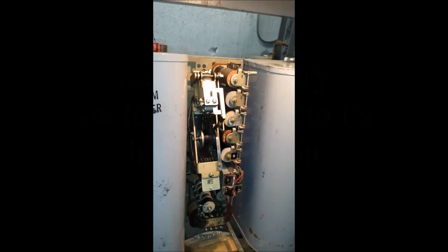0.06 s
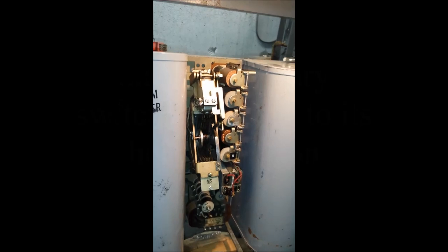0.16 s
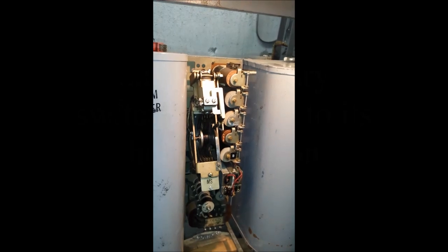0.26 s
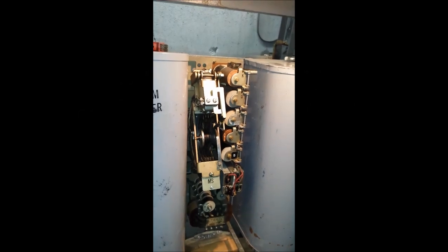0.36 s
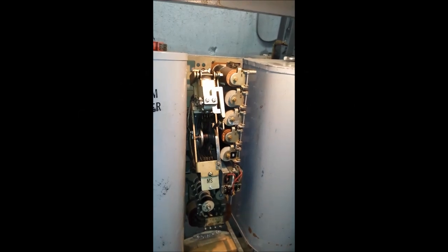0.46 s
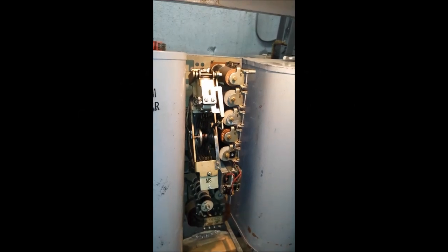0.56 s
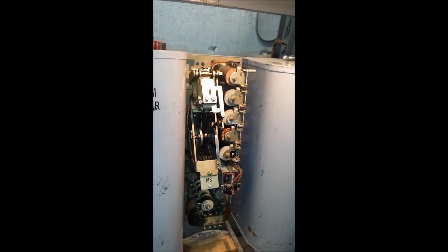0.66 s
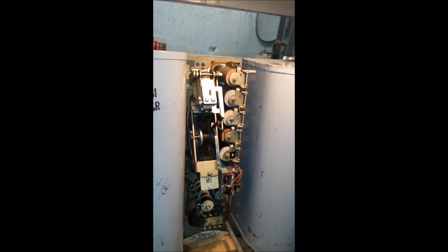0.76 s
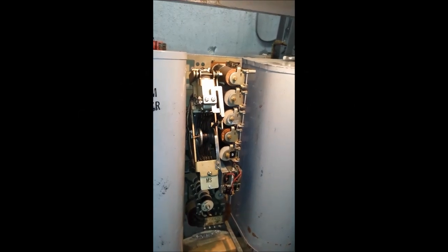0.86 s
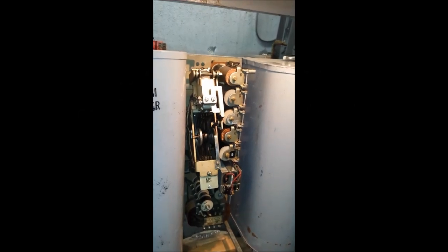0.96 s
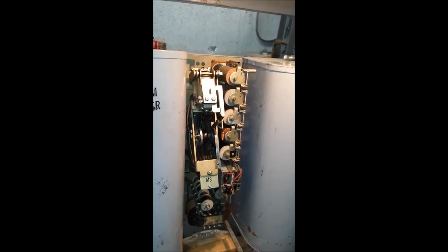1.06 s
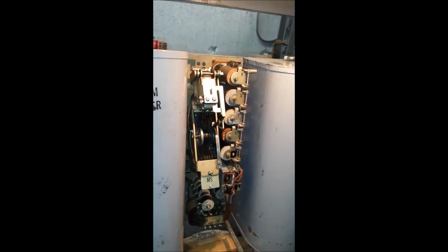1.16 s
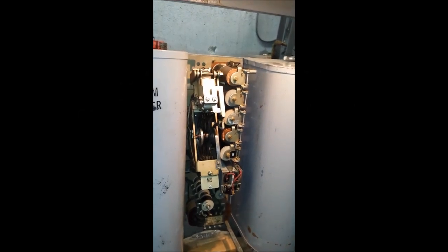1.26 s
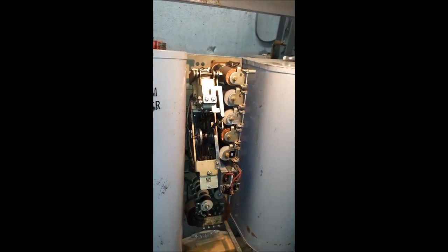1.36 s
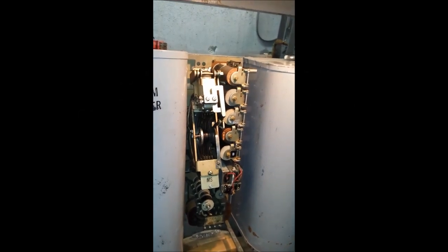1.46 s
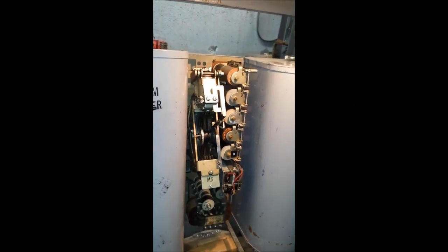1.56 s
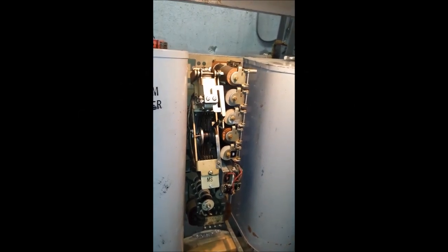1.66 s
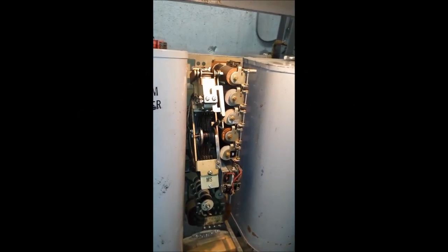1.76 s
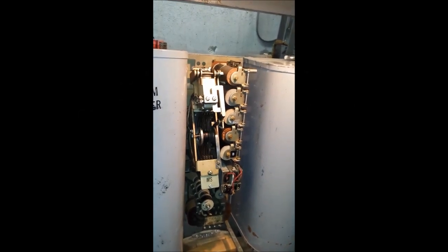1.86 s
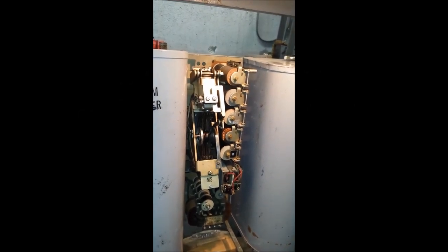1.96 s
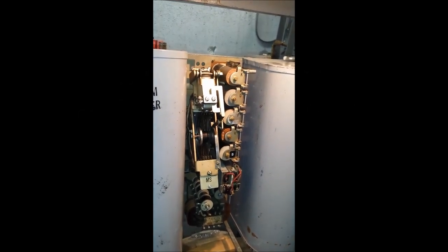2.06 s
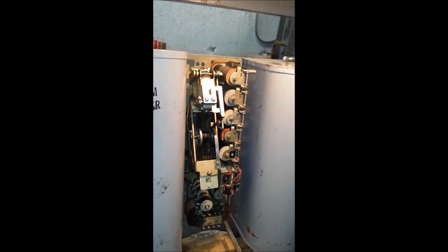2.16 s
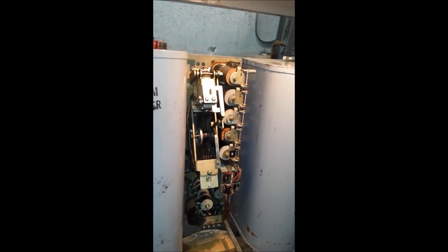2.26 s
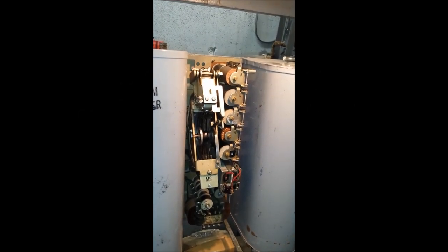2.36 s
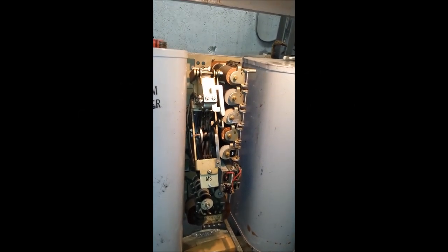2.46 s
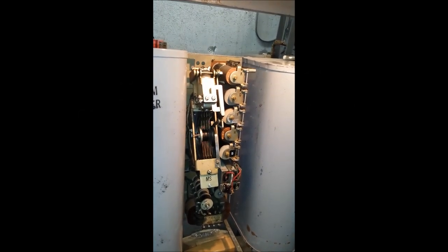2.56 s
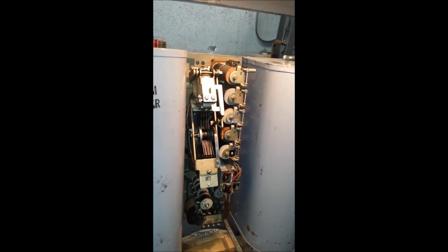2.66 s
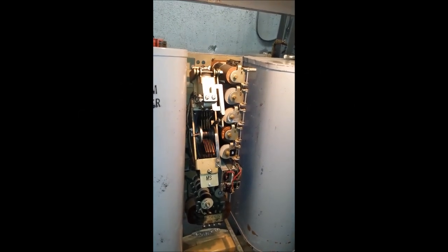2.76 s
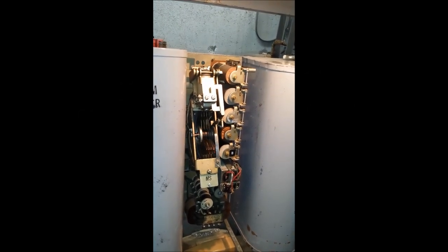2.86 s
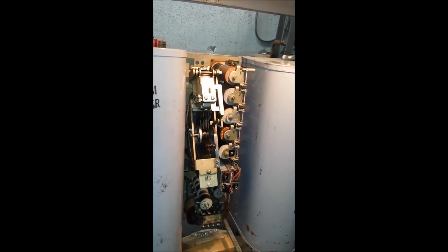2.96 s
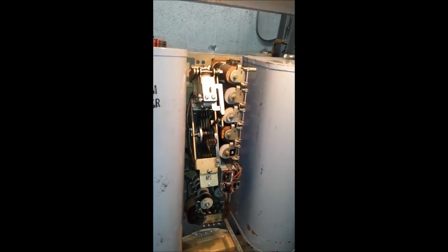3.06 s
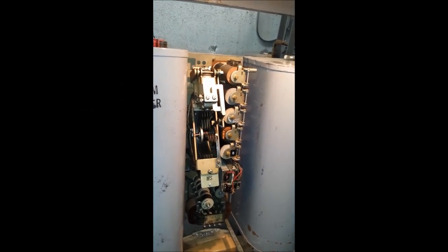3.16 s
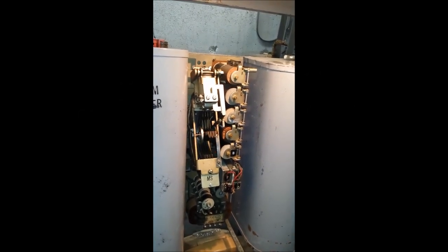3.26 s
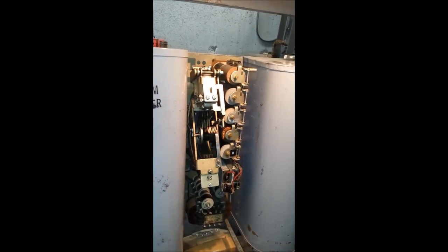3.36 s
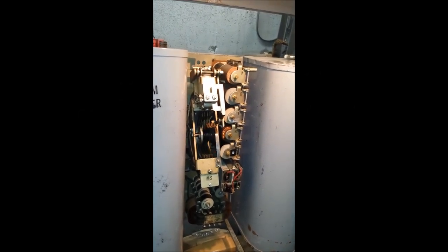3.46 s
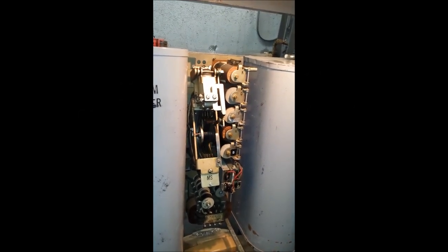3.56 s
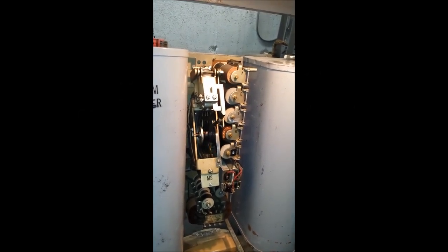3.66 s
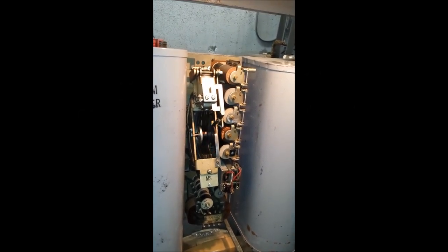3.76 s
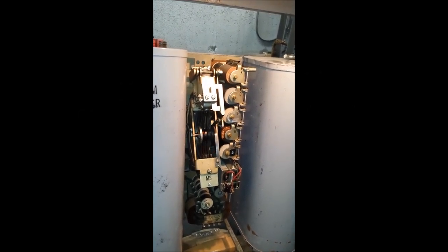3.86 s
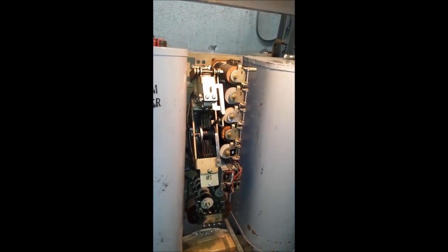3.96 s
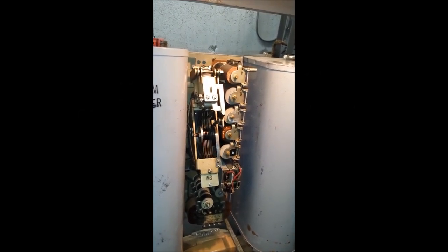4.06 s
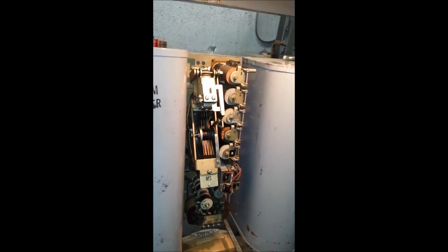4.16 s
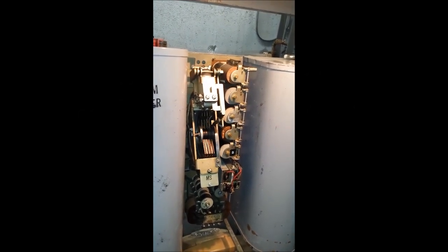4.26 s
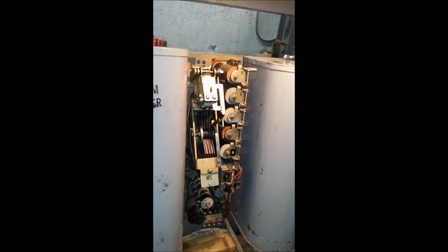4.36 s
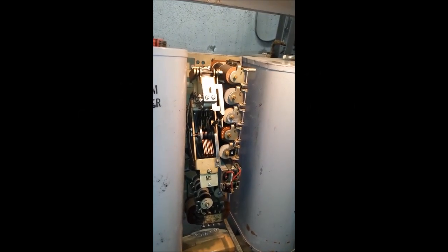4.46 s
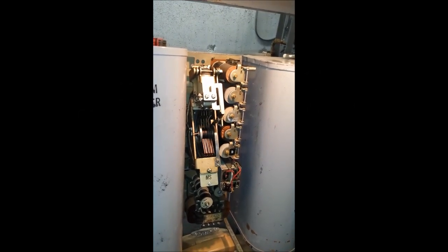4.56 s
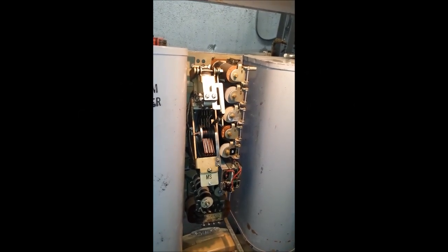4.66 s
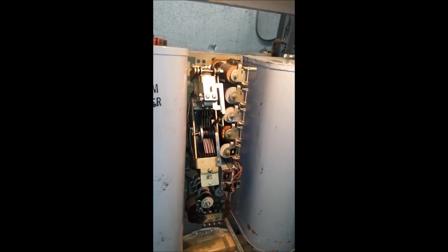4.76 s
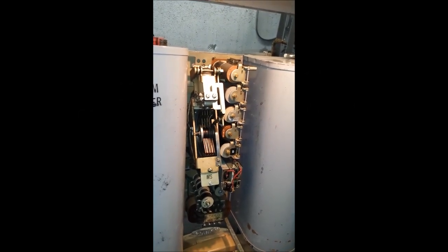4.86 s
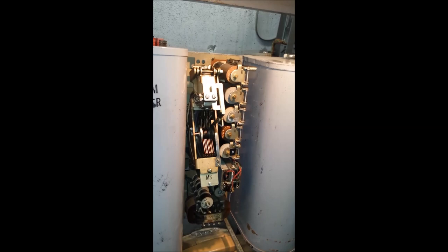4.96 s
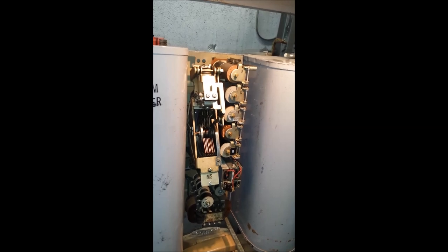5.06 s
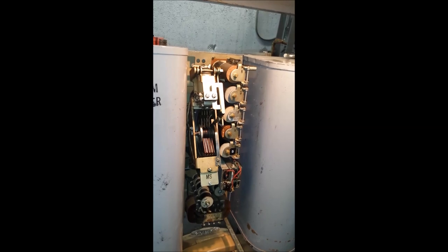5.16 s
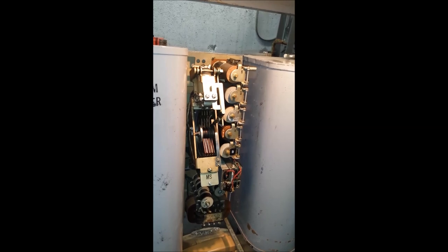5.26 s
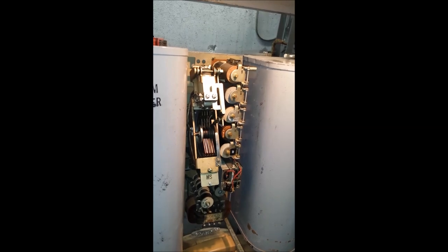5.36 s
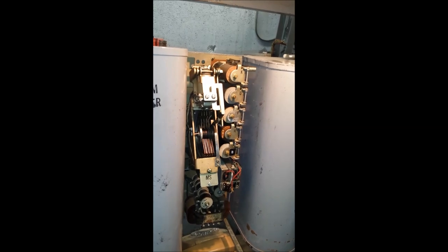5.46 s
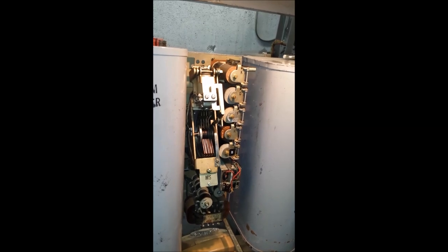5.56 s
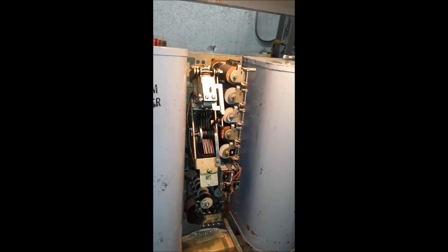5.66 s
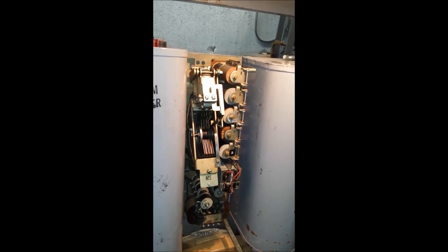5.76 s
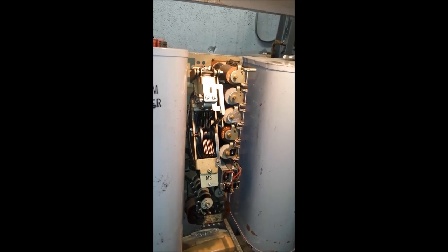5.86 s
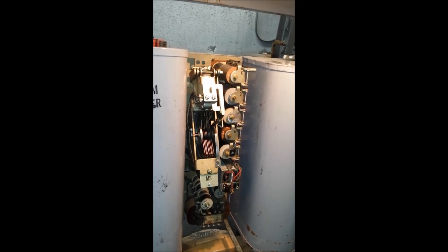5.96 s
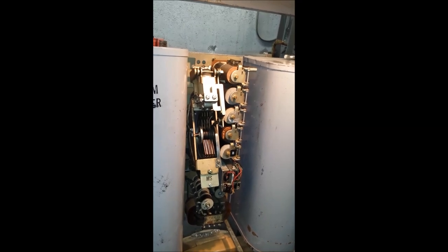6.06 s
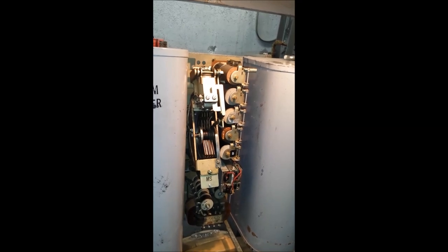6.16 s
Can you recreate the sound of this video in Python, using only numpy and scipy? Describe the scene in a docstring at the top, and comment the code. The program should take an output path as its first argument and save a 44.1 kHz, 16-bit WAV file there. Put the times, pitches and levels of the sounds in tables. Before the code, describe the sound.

An electromechanical switching rack buzzes and clicks, fires a two-second machine-gun run of bright metal clicks, then drops to faint transformer hum and hiss.

```python
"""Relay rack in a small equipment room, close on the left; reed, mains buzz and fan noise fade in.
A reed buzzes near 212 Hz while relays click, then near 255 Hz under load: phase-locked harmonics plus noise.
A stepping switch runs for 1.8 s: each metal touch rings modes of parts, frame and panels and rattles noise.
A last relay drops out; transformer harmonics and coloured fan noise stay, with faint chirps and far ticks.
The right port is nearly shut and gets a weak, smeared copy."""
import sys
import numpy as np
from scipy import signal
from scipy.fft import rfft, irfft
from scipy.io import wavfile
from scipy.ndimage import uniform_filter1d

SR = 44100
rng = np.random.default_rng(int(sys.argv[2]) if len(sys.argv) > 2 else 0)


def bounce(signal):
    """Save signal as a 16-bit WAV file at the path given by the first command-line argument."""
    frames = np.transpose(np.atleast_2d(signal))
    limited = np.clip(frames, -1, 1)
    pcm = np.round(limited * 32767).astype(np.int16)
    wavfile.write(sys.argv[1], SR, pcm)


N = 274600

# Level curve of reed, room and hiss: time_s, level_db
FADE = [(0, -18), (.25, -16.5), (.5, -8), (1.0, -3.5), (1.5, -1), (2.0, 0), (2.5, 3), (6.3, 0.5)]

# Stepping switch: armature, pawl and stop touch metal: start_s, level_db
STEPS = [(2.4872, -14), (2.5025, -15), (2.5165, -20), (2.519, -17), (2.5213, -17), (2.5382, -16),
         (2.5407, -12), (2.5463, -19), (2.5644, -18), (2.5819, -19), (2.5833, -12), (2.5852, -11),
         (2.5889, -22), (2.5915, -21), (2.6051, -20), (2.6069, -18), (2.6096, -19), (2.6214, -18),
         (2.6242, -18), (2.6263, -18), (2.6279, -20), (2.6301, -23), (2.6453, -13), (2.6501, -23),
         (2.6581, -18), (2.6715, -19), (2.674, -15), (2.6763, -15), (2.6906, -15), (2.6946, -14),
         (2.6971, -20), (2.7159, -14), (2.7184, -12), (2.7349, -17), (2.7483, -21), (2.751, -16),
         (2.754, -14), (2.7711, -14), (2.7734, -16), (2.7765, -24), (2.7786, -20), (2.7815, -22),
         (2.7836, -24), (2.7886, -20), (2.7918, -23), (2.8118, -12), (2.8154, -15), (2.8285, -12),
         (2.8432, -18), (2.8457, -14), (2.848, -14), (2.8514, -20), (2.8706, -13), (2.8746, -13),
         (2.8775, -24), (2.8872, -13), (2.9014, -20), (2.9036, -15), (2.9062, -16), (2.9078, -21),
         (2.9143, -20), (2.9273, -12), (2.9298, -17), (2.932, -19), (2.9357, -22), (2.9454, -14),
         (2.9605, -18), (2.9635, -14), (2.9668, -14), (2.9691, -22), (2.9712, -22), (2.9863, -13),
         (2.9901, -14), (2.9941, -22), (3.0005, -22), (3.0044, -15), (3.0068, -19), (3.0193, -19),
         (3.0218, -13), (3.0233, -16), (3.0255, -14), (3.0281, -21), (3.0295, -23), (3.045, -15),
         (3.0486, -14), (3.0627, -14), (3.0661, -21), (3.0787, -17), (3.0818, -15), (3.0851, -14),
         (3.0866, -23), (3.0884, -19), (3.1048, -13), (3.1081, -15), (3.123, -14), (3.1378, -17),
         (3.1404, -14), (3.1427, -16), (3.1464, -20), (3.163, -14), (3.1653, -16), (3.1669, -14),
         (3.171, -23), (3.1827, -17), (3.1954, -21), (3.198, -15), (3.1995, -16), (3.2017, -17),
         (3.2036, -23), (3.206, -22), (3.223, -14), (3.227, -11), (3.2394, -14), (3.2534, -19),
         (3.2559, -15), (3.2581, -15), (3.2601, -21), (3.2797, -15), (3.2829, -12), (3.2968, -14),
         (3.3093, -18), (3.3116, -18), (3.3145, -15), (3.3276, -16), (3.3303, -17), (3.3327, -14),
         (3.335, -22), (3.3534, -12), (3.3558, -15), (3.3573, -15), (3.3588, -23), (3.3679, -22),
         (3.3718, -16), (3.385, -19), (3.3876, -13), (3.3915, -19), (3.3967, -24), (3.4121, -15),
         (3.416, -14), (3.4307, -14), (3.4438, -18), (3.4461, -16), (3.448, -17), (3.4521, -23),
         (3.4669, -14), (3.471, -24), (3.487, -21), (3.491, -15), (3.5072, -18), (3.5102, -20),
         (3.5117, -17), (3.5141, -12), (3.5355, -15), (3.5394, -13), (3.5434, -24), (3.5521, -13),
         (3.5649, -20), (3.5676, -18), (3.5695, -14), (3.586, -17), (3.5893, -15), (3.6057, -20),
         (3.6081, -22), (3.6105, -14), (3.6139, -22), (3.6244, -18), (3.6272, -16), (3.6292, -15),
         (3.6502, -15), (3.6539, -13), (3.6686, -13), (3.6817, -20), (3.6837, -19), (3.6859, -16),
         (3.7031, -16), (3.7054, -16), (3.7095, -23), (3.7113, -23), (3.7245, -21), (3.7271, -16),
         (3.7287, -15), (3.7449, -17), (3.7476, -15), (3.7497, -15), (3.752, -13), (3.7557, -20),
         (3.7576, -24), (3.7736, -13), (3.7767, -16), (3.7794, -23), (3.7894, -20), (3.7914, -15),
         (3.8052, -19), (3.8076, -16), (3.8093, -13), (3.8138, -22), (3.8287, -16), (3.8311, -13),
         (3.8339, -19), (3.8504, -18), (3.8646, -20), (3.8672, -15), (3.8692, -16), (3.8709, -17),
         (3.8728, -20), (3.8916, -15), (3.894, -18), (3.8959, -19), (3.8983, -24), (3.9083, -15),
         (3.923, -20), (3.9253, -16), (3.9274, -14), (3.9288, -14), (3.931, -20), (3.9468, -17),
         (3.9482, -15), (3.9521, -21), (3.9678, -23), (3.9732, -14), (3.9876, -20), (3.9892, -19),
         (3.9913, -16), (3.9933, -15), (3.998, -24), (4.0112, -15), (4.0141, -13), (4.0181, -22),
         (4.0305, -15), (4.0461, -18), (4.0487, -16), (4.0508, -14), (4.0716, -16), (4.0743, -15),
         (4.0763, -21), (4.0893, -16), (4.1046, -22), (4.1069, -16), (4.1201, -17), (4.1224, -15),
         (4.1244, -15), (4.1261, -16), (4.1407, -18), (4.1437, -14), (4.1458, -14), (4.1476, -16),
         (4.1498, -20), (4.168, -13), (4.1708, -16), (4.1857, -16), (4.1986, -21), (4.2009, -20),
         (4.2026, -18), (4.2047, -17), (4.2067, -23), (4.2167, -20), (4.2193, -13), (4.2215, -16),
         (4.2372, -17), (4.2396, -16), (4.2655, -21), (4.2671, -15), (4.2833, -14), (4.2892, -23),
         (4.2918, -21), (4.2937, -22)]
STEP_THUD_DB = -32   # re touch
STEP_FRAME_DB, STEP_FRAME_SLOPE = -33, .48   # frame level at a -15 dB touch; dB per dB of touch
LOOSE_COUNT, LOOSE_DB, LOOSE_SPREAD_DB = 320, -29, 2.5   # light chance touches during the run

# Relay blows, closing or dropping out: start_s, level_db, thud_db (re level)
RELAY_BLOWS = [(.4005, -46, -30), (.4996, -35, -34), (.5276, -25, -22), (.5686, -32, -26), (.803, -22, -36),
               (.8183, -28, -23), (.8276, -30, -24), (1.3656, -24, -42), (1.3937, -17, -29),
               (1.4345, -26, -26), (1.6548, -16, -34), (1.6703, -24, -30), (2.1154, -29, -40),
               (2.2133, -26, -40), (2.2413, -15, -31), (2.2816, -20, -29), (2.3662, -18, -40),
               (2.436, -46, -35), (4.468, -23, -48)]
# Further relay contact clicks, before or after the main blows: start_s, level_db
CONTACT_CLICKS = [(.398, -48), (.4108, -48), (.5026, -42), (.53, -27), (.5316, -26), (.5345, -35),
                  (.5393, -34), (.5432, -38), (.5472, -39), (.5721, -38), (.5761, -42), (.8045, -28),
                  (.8091, -36), (.8165, -29), (.8233, -32), (.8316, -32), (.837, -36), (1.3961, -17),
                  (1.3986, -23), (1.4025, -28), (1.4054, -29), (1.4362, -27), (1.6562, -24), (1.6625, -30),
                  (1.6837, -29), (2.2437, -14), (2.2463, -19), (2.2503, -27), (2.2534, -28), (2.2565, -28),
                  (2.2589, -27), (2.2836, -25), (2.2874, -27), (2.3539, -30), (2.3685, -23), (2.3741, -29),
                  (2.3788, -28), (4.4714, -29), (4.4743, -38)]
RELAY_FRAME_DB, CLICK_FRAME_DB, CLICK_THUD_DB = -21, -16, -33   # re blow or click
BOOM_HZ, BOOM_DB, BOOM_T60_S = 250, 5, .4   # panel behind the relays, level re thud
RELEASE_S = 4.4685   # last relay drops out
# Two springs rung by the release: mode_hz, level_db, t60_s
SPRING_MODES = [(3190, -52, 0.3), (4410, -34, 0.025)]

# Small steel parts: mode_hz, level_db, t60_s
PART_MODES = [(5800, -14, .008), (6200, -2.5, .011), (6500, .5, .013), (6850, -1.5, .011), (7250, -6, .010),
              (7700, -6, .008), (8450, -14, .008), (9600, -13, .007), (10700, -14, .006),
              (12300, -16, .006), (14800, -13, .006)]
# Frame: mode_hz, level_db, t60_s
FRAME_MODES = [(1398, -17, 0.024), (2050, -4, 0.04), (2270, -1.5, 0.021), (2556, -9, 0.058),
               (3160, -8.5, 0.033), (3565, 0.5, 0.014), (4060, -4, .015), (4594, 5, 0.012)]
# Cabinet panels: mode_hz, level_db, t60_s
PANEL_MODES = [(160, -11.5, 0.16), (199, -9, 0.098), (247.4, -8, 0.33), (292, -8, 0.16), (332, -7, 0.33),
               (482, -11.5, 0.13), (599, -6, 0.15), (788, -10, 0.089), (1034, -6.5, 0.082)]
# Bright blow noise spectrum, mostly above 5 kHz: freq_hz, density_db
BRIGHT = [(2650, -57), (4500, -18), (5260, -40), (6290, -4), (6640, -1), (7210, -11), (7770, -8),
          (8900, -17.5), (9860, -16), (13700, -26), (15100, -14.5), (15900, -14.5), (16400, -41)]
# Frame rattle spectrum: freq_hz, density_db
BODY = [(650, -52), (1100, -3.5), (1230, -13.5), (1340, -10.5), (1760, -11), (2130, -0.5), (2800, -0.5),
        (3550, 4), (5230, 0), (5600, 5), (7280, 3), (12300, -120)]

# Reed states: start_s, stop_s, hum_db, buzz_db, noise_db (re buzz)
IDLE_REED = (-.1, .53, -58, -50.5, -7)
SEATED_REED = (.52, .8, -56, -52, -6)   # idling on after the first relays close
LOADED_REED = (.81, 2.335, -46, -40, -12)
# Reed harmonics in each state: order, level_db
IDLE_ORDERS = [(1, -0.8), (2, -12.0), (3, -4.9), (4, -11.7), (5, -4.4), (6, -10.8), (7, -23.8), (8, -18.5),
               (9, -2.3), (10, -3.6), (11, -16.3), (12, 0.0), (13, -11.3), (14, -8.1), (15, -2.2),
               (16, -18.0), (17, -7.1), (18, -11.4), (19, -11.3), (20, -12.1), (21, -14.5), (22, -13.7),
               (23, -19.5), (24, -16.3), (25, -19.9), (26, -4.4), (27, -13.9), (28, -15.8), (29, -7.6),
               (30, -5.4), (31, -5.2), (32, -2.3), (33, -0.8), (34, -5.6), (35, -6.5), (36, -2.5),
               (37, -25.1), (40, -11.2), (41, -4.9), (42, -11.7), (43, -18.5), (44, -9.6), (45, -10.7),
               (46, -10.4), (48, -24.7), (49, -24.9), (54, -23.2), (56, -24.9), (58, -25.9), (60, -18.2),
               (61, -20.7), (62, -23.7), (63, -17.3), (64, -25.0)]
SEATED_ORDERS = [(1, -3), (2, -11), (3, -15), (4, -14), (5, 1), (6, -18), (7, -21), (8, -20), (9, -13),
                 (10, -13), (11, -18), (12, -4), (13, -19), (14, -8), (15, -15), (16, -20), (17, -12),
                 (18, -20), (19, -11), (20, -7), (21, -15), (22, -15), (23, -23), (24, -18), (25, -12),
                 (26, -10), (27, -13), (28, -12), (29, -13), (30, -10), (31, -4), (32, -11), (33, -11),
                 (34, -13), (35, -17), (36, -17), (37, -22), (38, -24), (39, -15), (40, -14), (41, -17),
                 (42, -14), (43, -20), (44, -14), (45, -18), (46, -22)]
LOADED_ORDERS = [(1, -4.6), (2, -12.2), (3, -30.9), (4, -3.7), (5, -32.7), (7, -31.9), (8, -22.0),
                 (9, -24.8), (10, -14), (11, -25.0), (12, -13.9), (13, -28.6), (14, -19.3), (15, -29.5),
                 (16, -22.4), (17, -19.3), (18, -26.2), (19, -19.1), (20, -15), (21, -17.5), (22, -15.5),
                 (23, -14.2), (24, -13.5), (25, 0.0), (26, -3), (27, -5.5), (28, -13), (29, -18.1),
                 (30, -22.9), (31, -30.8), (32, -32.9), (33, -25.8), (34, -32.9), (35, -19), (36, -18),
                 (37, -27.4), (38, -29.4), (39, -32.8), (40, -34.1), (41, -36.1), (42, -28.3), (43, -29.2),
                 (48, -31.1), (49, -35.8), (50, -29.8), (51, -24.3), (52, -30.7), (53, -32.0), (54, -29.0),
                 (56, -30.6), (59, -35.0), (60, -36.5)]
# Reed pitch curves: time_s, pitch_hz
IDLE_PITCH = [(0, 211.8), (.18, 211.3), (.32, 212), (.5, 211.3), (.6, 214), (.84, 213.3)]
LOADED_PITCH = [(.84, 254.3), (1.1, 255.0), (1.35, 254.7), (1.47, 255.75), (1.65, 254.9), (2.19, 254.85),
                (2.31, 255.5)]
# Reed contact noise spectrum: freq_hz, density_db
CHATTER = [(710, -70), (1200, -21), (2400, -20.5), (2480, -8.5), (2710, -20), (3050, -18.5), (4550, -18),
           (6580, -4), (8000, -10.5), (11700, -20.5), (13500, -12), (15500, -22), (16000, -31)]
# Brief rasps of the reed contacts: centre_s, width_s, extra_noise_db
RASPS = [(1.0, .03, 4), (1.27, .03, 4), (1.7, .04, 3), (2.1, .05, 4)]
CHATTER_DEPTH = .19   # noise modulation by the reed, 0-1
REED_RISE_DB_PER_S, REED_FALL_DB_PER_S = 900, 250
WAVER_DB, WAVER_S = 2.3, .1   # independent waver of each buzz harmonic
SMEAR_RAD = .3   # phase lag times order squared
TURN_HZ, TURN_RAD = 6250, 2.2   # phase step across the contact spring resonance
JOLT_REF_DB, JOLT_RISE_S, JOLT_T60_S = -14, .03, .25   # relay blow that strongly upsets the reed
HUM_DIP_DB, BUZZ_DIP_DB, CHATTER_GAIN_DB = 10, 3.5, 4   # at upset 1

MAINS_HZ = 60.012
# Strong transformer harmonics: order, rms_db
MAINS_ORDERS = [(2, -71), (3, -76.5), (6, -74.5), (7, -70), (8, -72), (9, -71.5), (11, -80.5), (13, -78),
                (14, -69), (15, -80), (16, -76), (17, -79.5), (21, -80.5), (23, -76.5), (30, -75),
                (45, -75.5), (51, -74.5), (52, -75.5), (98, -105), (99, -77), (103, -91), (104, -74),
                (105, -77), (107, -62.5), (108, -72), (109, -68), (110, -81), (111, -79), (113, -81)]
FAINT_ORDERS_DB = -61   # rms of a repeated cycle holding every harmonic
# Fan and air spectrum: freq_hz, density_db
ROOM = [(15, -42), (25, -9), (70, -9), (161, 4), (285, -9.5), (354, -2), (840, -8), (1100, -12),
        (3160, -16), (4370, -22), (6380, -9.5), (7510, -24.5), (16000, -55.5)]
ROOM_DB = -58.5
# Faint bird-like chirps near 4.5 kHz with an octave above:
# start_s, length_s, pitch_hz, level_db, octave_db (re level)
CHIRPS = [(4.68, 0.055, 4580, -60.5, -6), (4.853, 0.071, 4400, -57.5, -12), (5.163, 0.07, 4600, -60, -7),
          (5.552, 0.068, 4450, -58, -14), (5.643, .06, 4600, -59.5, -9), (6.155, 0.048, 4570, -62, -7)]
# Distant relays: start_s, level_db
FAR_TICKS = [(4.93, -57), (5.09, -56), (5.33, -55), (5.43, -59), (5.82, -55), (5.91, -60), (6.1, -65)]

LEFT_GAIN = 2   # on all sources
# Loss at the nearly shut right port: freq_hz, loss_db
SHUT_PORT = [(60, 1), (200, 30), (700, 29.5), (1500, 24.5), (2200, 30.5), (4200, 28.5), (5500, 32),
             (6300, 51.5), (7500, 36), (9300, 25.5), (14000, 22.5), (15500, 30)]
SEEP_T60_S = .15
HISS_DB = np.array([[-73.5], [-75.0]])   # left, right
STOPBAND_HZ = 16600


def amp(db):
    """dB to gain."""
    return 10 ** (np.asarray(db) / 20)


def rms_one(x):
    """Scale to rms 1."""
    return x / np.sqrt(np.mean(x ** 2) + 1e-20)


def in_time(rows):
    """Interpolate curve columns to every sample."""
    time_s, *columns = np.transpose(rows)
    return [np.interp(np.arange(N) / SR, time_s, c) for c in columns]


def butter(x, order, hz, kind="low"):
    """Butterworth filter."""
    return signal.sosfilt(signal.butter(order, hz, kind, fs=SR, output="sos"), x)


def colour(x, points):
    """Minimum-phase filter of the given spectrum, by folding its cepstrum."""
    hz, db = np.transpose(points)
    grid_hz = np.maximum(np.fft.rfftfreq(4096, 1 / SR), 1)
    log_gain = np.interp(np.log(grid_hz), np.log(hz), db) * np.log(10) / 20
    cepstrum = irfft(log_gain)
    cepstrum[1:2048] *= 2
    cepstrum[2049:] = 0
    impulse = irfft(np.exp(rfft(cepstrum)))
    return signal.fftconvolve(x, impulse)[:N]


def decay(clicks, t60_s):
    """Exponentially falling envelope after each click."""
    return signal.lfilter([1], [1, -amp(-60 / (t60_s * SR))], clicks + 1e-18)


def train(times_s, db, sign=1):
    """Clicks of given levels and signs."""
    clicks = np.zeros(N)
    np.add.at(clicks, (np.asarray(times_s) * SR).astype(int), sign * amp(db))
    return clicks


def step_contacts():
    """Switch touches; light ones stir the frame nearly as much as hard ones: time, level, frame ring."""
    s, db = np.transpose(STEPS)
    loose_s = rng.uniform(s[0], s[-1], size=LOOSE_COUNT)
    loose_db = LOOSE_DB + LOOSE_SPREAD_DB * rng.standard_normal(LOOSE_COUNT)
    s, db = np.append(s, loose_s), np.append(db, loose_db)
    frame_db = STEP_FRAME_DB + STEP_FRAME_SLOPE * (db + 15) - db
    return s, db, np.minimum(frame_db, -13)


def relay_contacts():
    """Main relay blows and further contact clicks: time, level, frame ring, thud."""
    main_blows = [(s, db, RELAY_FRAME_DB, thud_db) for s, db, thud_db in RELAY_BLOWS]
    clicks = [(s, db, CLICK_FRAME_DB, CLICK_THUD_DB) for s, db in CONTACT_CLICKS]
    return np.transpose(main_blows + clicks)


def strike(s, db, modes, spread_db, reach_s):
    """Each blow rings two-pole modes with random strength, sign and arrival up to reach_s late."""
    out = 0
    for hz, level_db, t60_s in modes:
        arrival_s = s + reach_s * rng.random(len(s))
        push_db = db + level_db + spread_db * rng.standard_normal(len(s))
        push = train(arrival_s, push_db, rng.choice([-1, 1], len(s)))
        r, w = amp(-60 / (t60_s * SR)), 2 * np.pi * hz / SR
        out = out + signal.lfilter([0, np.sin(w)], [1, -2 * r * np.cos(w), r * r], push + 1e-18)
    return out


def burst(times_s, db, spectrum, crack_s, tail_s, tail_db):
    """Noise with a crack and a longer rattle (t60s) after each blow, coloured by the metal."""
    clicks = train(times_s, db)
    envelope = decay(clicks, crack_s) + amp(tail_db) * decay(clicks, tail_s)
    unit = np.std(colour(rng.standard_normal(N), spectrum))
    return colour(envelope * rng.standard_normal(N), spectrum) / unit


def blows(s, db, frame_db, thud_db):
    """Steel parts ring at once, the frame just after, panels late and soft; loose parts rattle on."""
    parts = strike(s - .0004, db - 6, PART_MODES, spread_db=1.5, reach_s=.0008)
    frame = strike(s, db + frame_db - 6.5, FRAME_MODES, spread_db=3.0, reach_s=.003)
    small = butter(parts + frame, 2, 1300, "high")   # small parts radiate no bass
    panels = strike(s + .008, db + thud_db, PANEL_MODES, spread_db=1.5, reach_s=.012)
    thud = butter(uniform_filter1d(panels, size=15), 6, 135, "high")   # panels too small for deep bass
    bright = amp(-19.5) * burst(s, db, BRIGHT, crack_s=.016, tail_s=.12, tail_db=-14)
    body = amp(-18.0) * burst(s, db + frame_db, BODY, crack_s=.016, tail_s=.21, tail_db=-2.5)
    return small + thud + bright + body


def boom():
    """The panel behind the relays rings long on one low mode."""
    s, db, thud_db = np.transpose(RELAY_BLOWS)
    return strike(s + .014, db + thud_db, [(BOOM_HZ, BOOM_DB, BOOM_T60_S)], spread_db=0, reach_s=0)


def release():
    """The last relay's drop-out rings two springs."""
    return strike(np.array([RELEASE_S]), 0, SPRING_MODES, spread_db=0, reach_s=0)


def jolt():
    """Reed upset by relay blows and clicks, 0-1: quick rise, slower decay."""
    s, db, *_ = relay_contacts()
    blow = train(s, db - JOLT_REF_DB) / amp(in_time(FADE)[0])
    return np.clip(decay(blow, JOLT_T60_S) - decay(blow, JOLT_RISE_S), 0, 1)


def reed(state, orders, pitch, jitter_rad):
    """Harmonics to order 5 hum in the frame, higher ones buzz; contact noise pulses once a cycle."""
    start_s, stop_s, hum_db, buzz_db, noise_db = state
    t, upset = np.arange(N) / SR, jolt()
    live = (t > start_s) & (t < stop_s + .15)
    rise_db = np.minimum(REED_RISE_DB_PER_S * (t - start_s) - 30, 0)
    fall_db = REED_FALL_DB_PER_S * np.maximum(t - stop_s, 0)
    swing_db = in_time(FADE)[0] + rise_db - fall_db

    wobble = rms_one(uniform_filter1d(rng.standard_normal(N), size=900))
    hz, = in_time(pitch)
    phase = (2 * np.pi * np.cumsum(hz) / SR + jitter_rad * wobble)[live]
    hum = sum(amp(db) * np.cos(k * phase) for k, db in orders if k <= 5)

    # the frame smears each contact blow: harmonics do not peak together
    knots_s = np.arange(30) * WAVER_S + start_s
    buzz = 0
    for k, db in orders:
        if k > 5:
            knot_gains = amp(db + WAVER_DB * rng.standard_normal(len(knots_s)))
            lag_rad = SMEAR_RAD * k ** 2 - TURN_RAD * (k * hz.mean() > TURN_HZ)
            buzz = buzz + np.interp(t[live], knots_s, knot_gains) * np.cos(k * phase - lag_rad)

    gate = 1 + CHATTER_DEPTH * np.cos(phase)
    noise = gate * rms_one(colour(rng.standard_normal(N), CHATTER))[live]
    rasp_db = sum(db * np.exp(-((t - s) / width_s) ** 2) for s, width_s, db in RASPS)

    hum_gain = amp(hum_db + swing_db - HUM_DIP_DB * upset)[live]
    buzz_gain = amp(buzz_db + swing_db - BUZZ_DIP_DB * upset)[live]
    noise_gain = amp(buzz_db + swing_db + noise_db + rasp_db + CHATTER_GAIN_DB * upset)[live]
    out = np.zeros(N)
    out[live] = hum_gain * rms_one(hum) + buzz_gain * rms_one(buzz) + noise_gain * noise
    return out


def transformers():
    """Mains harmonics: strong ones as sines, the rest from one repeated noise cycle."""
    phase = 2 * np.pi * MAINS_HZ * np.arange(N) / SR
    loud = sum(amp(db) * np.sqrt(2) * np.sin(k * phase + 2 * np.pi * rng.random())
               for k, db in MAINS_ORDERS)
    one_cycle = rng.standard_normal(735)
    cycle_index = (phase / (2 * np.pi) % 1 * len(one_cycle)).astype(int)
    faint = np.diff(one_cycle[cycle_index], prepend=0)   # differencing brightens
    return loud + amp(FAINT_ORDERS_DB) * rms_one(colour(faint, ROOM))


def fans():
    """Steady air noise of the room spectrum."""
    return amp(ROOM_DB) * rms_one(colour(rng.standard_normal(N), ROOM))


def chirps():
    """Bird-like narrow-band noise: sharp start, Gaussian fall, a second band an octave up."""
    out, t = np.zeros(N), np.arange(N) / SR
    for s, length_s, hz, db, octave_db in CHIRPS:
        envelope = (t > s) * np.exp(-(np.maximum(t - s, 0) / length_s) ** 2)
        for k, level_db in ((1, db), (2, db + octave_db)):
            band = butter(rng.standard_normal(N), 2, [k * (hz - 280), k * (hz + 280)], "band")
            out += amp(level_db) * envelope * rms_one(band)
    return out


def far_ticks():
    """Relays on other racks, dulled and smeared by the room."""
    ticks = burst(*np.transpose(FAR_TICKS), BRIGHT, crack_s=.12, tail_s=.25, tail_db=-16)
    return butter(ticks, 2, 9500)


def seep(x):
    """Into the shut port: bass passes directly, the rest by a decaying scatter of later paths."""
    paths = rng.standard_normal(6000) * amp(-60 * np.arange(6000) / SR / SEEP_T60_S)
    paths = butter(paths / np.linalg.norm(paths), 2, 600, "high")
    return signal.fftconvolve(x, paths)[:N] + butter(x, 2, 600)


def scene():
    """All sources at the left port; a much weakened copy at the right."""
    near = blows(*step_contacts(), STEP_THUD_DB) + blows(*relay_contacts()) + boom() + release()
    near += reed(IDLE_REED, IDLE_ORDERS, IDLE_PITCH, jitter_rad=.005)
    near += reed(SEATED_REED, SEATED_ORDERS, IDLE_PITCH, jitter_rad=.005)
    near += reed(LOADED_REED, LOADED_ORDERS, LOADED_PITCH, jitter_rad=.005)
    room = amp(in_time(FADE)[0]) * (transformers() + fans())
    left = LEFT_GAIN * (near + room + chirps() + far_ticks())
    right = colour(seep(left), [(hz, -loss_db) for hz, loss_db in SHUT_PORT])
    return np.array([left, right])


def record(dry):
    """Bass cut, soft peak limiting, hiss and rumble following the fade, steep top cut."""
    heard = butter(dry, 4, 105, "high")
    fade_db = in_time(FADE)[0]
    hiss = amp(HISS_DB + fade_db) * rng.standard_normal(dry.shape)
    low_noise = signal.lfilter([.02], [1, -.98], rng.standard_normal(dry.shape))
    rumble = amp(-54 + fade_db) * low_noise
    top_cut = signal.cheby2(12, 80, STOPBAND_HZ, fs=SR, output="sos")
    return signal.sosfilt(top_cut, .5 * np.tanh(heard / .5) + hiss + rumble)


dry = scene()
out = record(dry)
bounce(out)
```